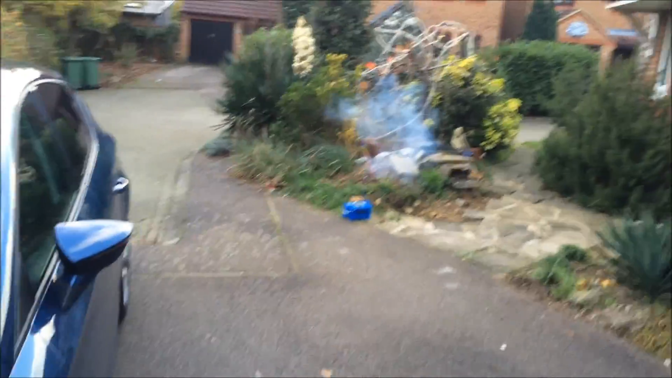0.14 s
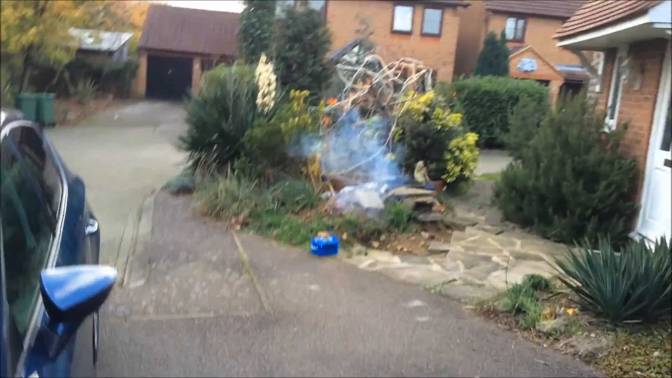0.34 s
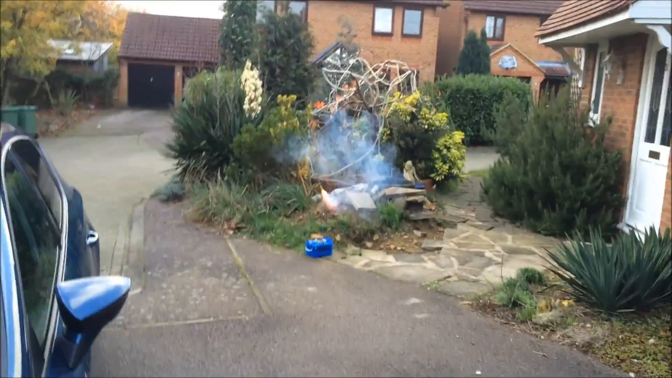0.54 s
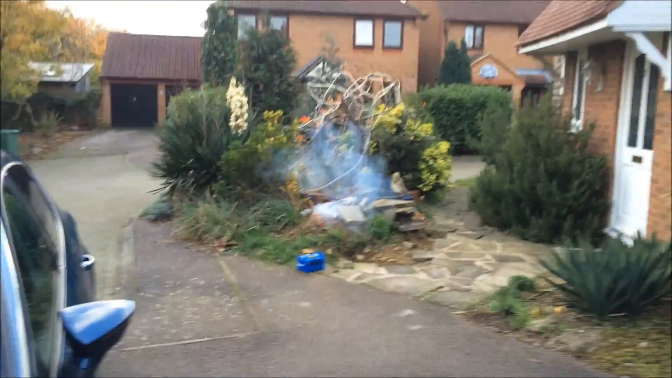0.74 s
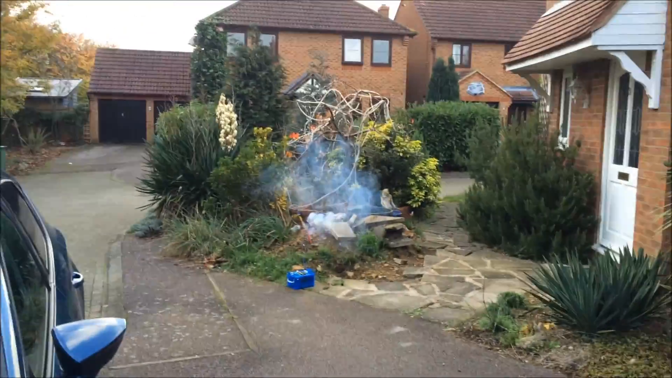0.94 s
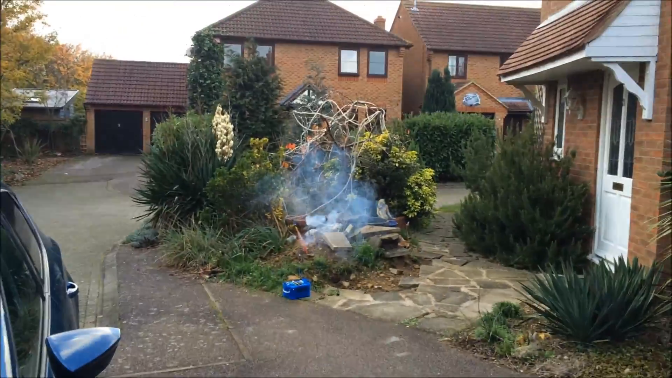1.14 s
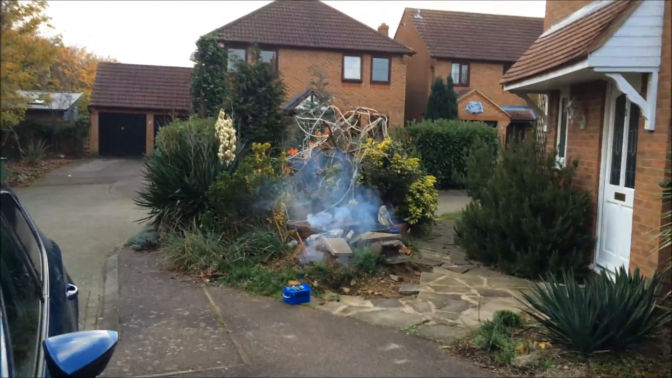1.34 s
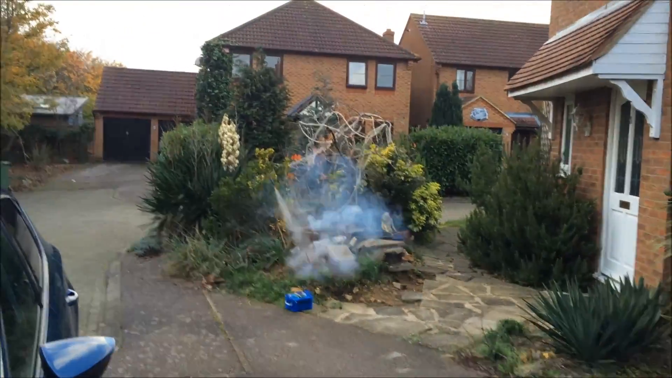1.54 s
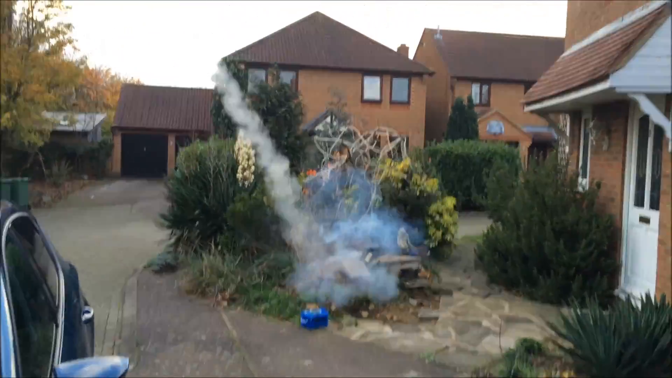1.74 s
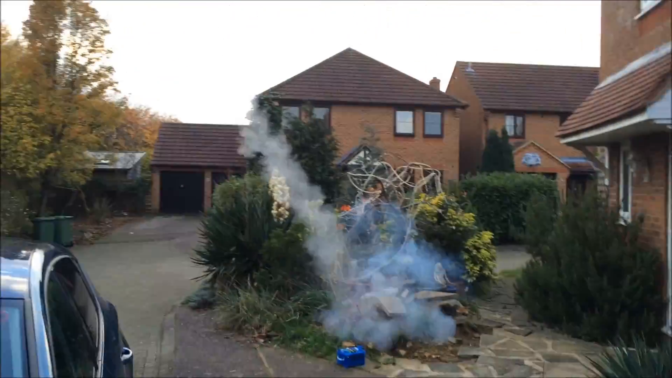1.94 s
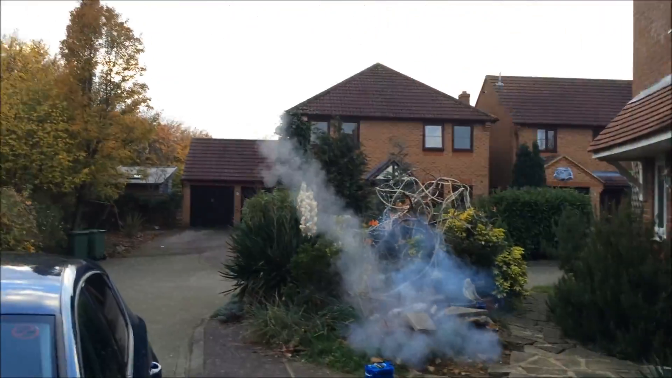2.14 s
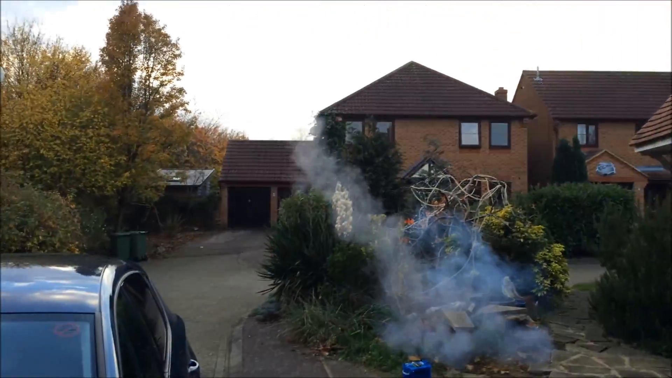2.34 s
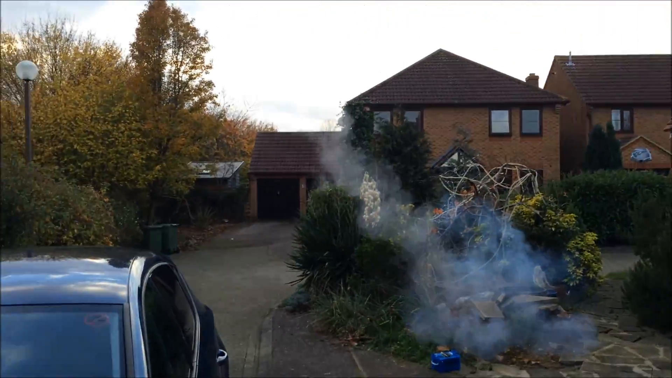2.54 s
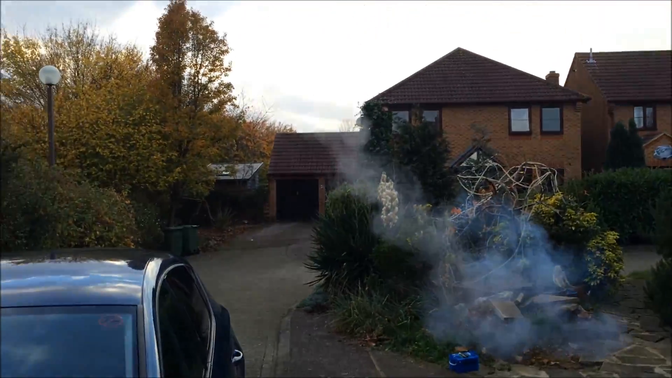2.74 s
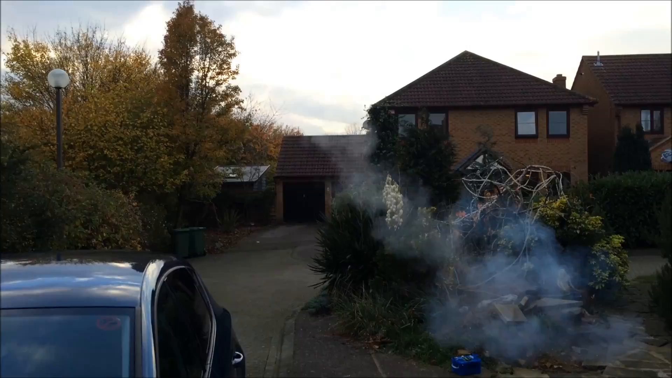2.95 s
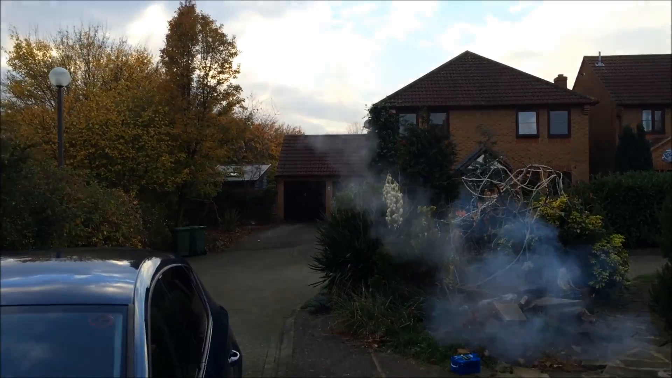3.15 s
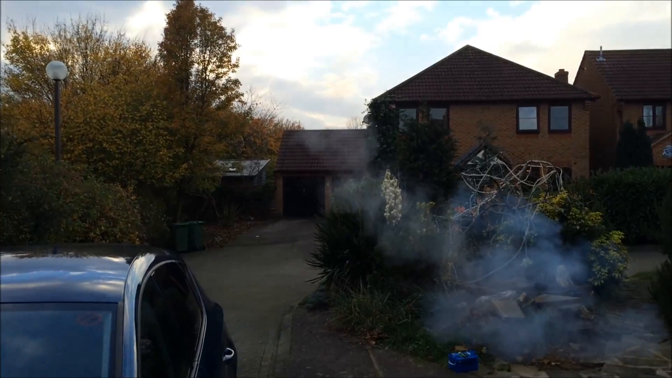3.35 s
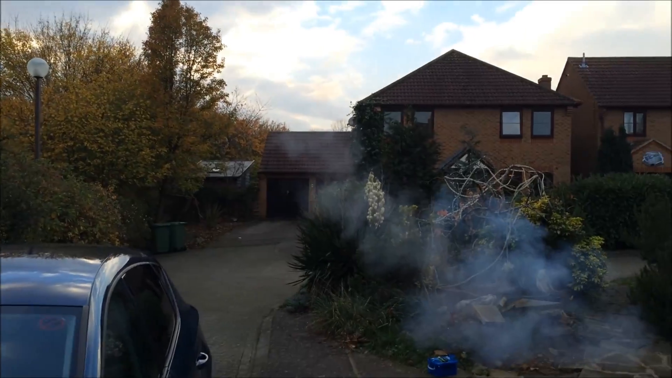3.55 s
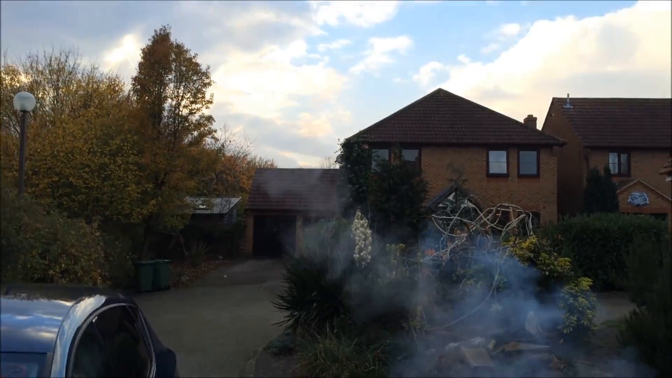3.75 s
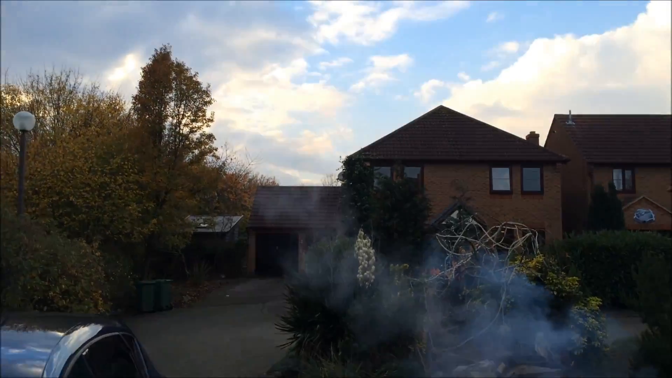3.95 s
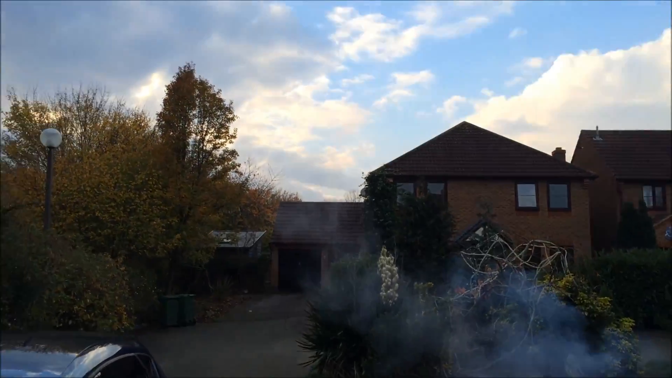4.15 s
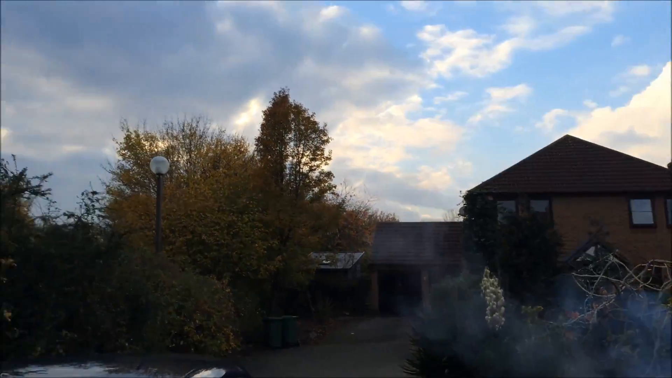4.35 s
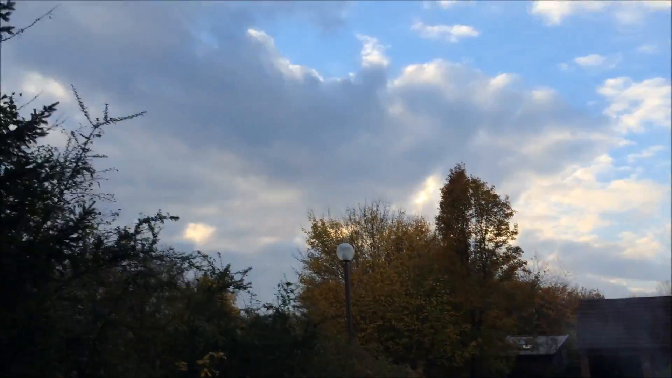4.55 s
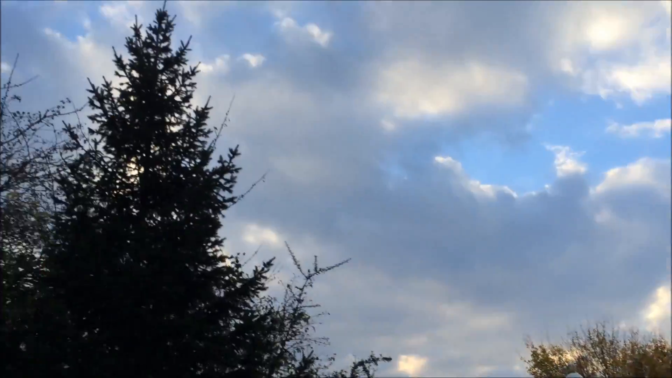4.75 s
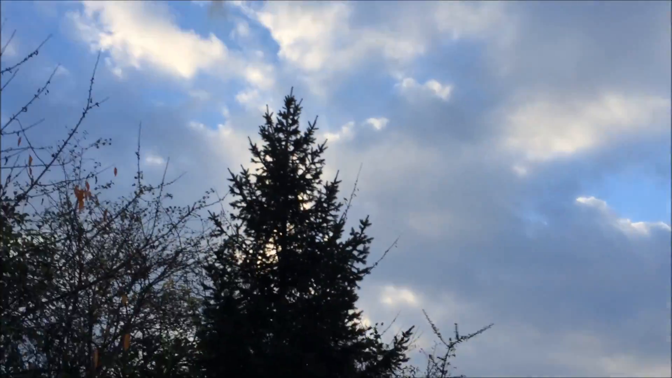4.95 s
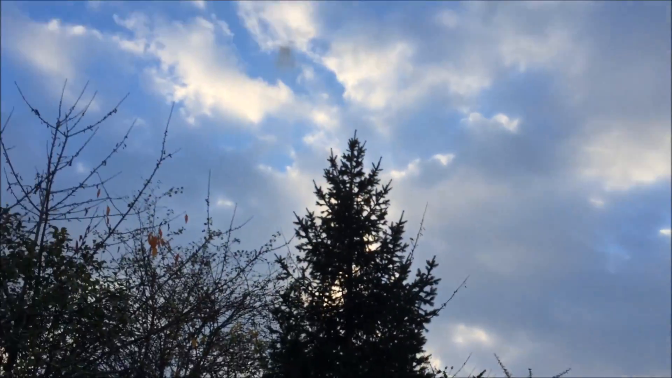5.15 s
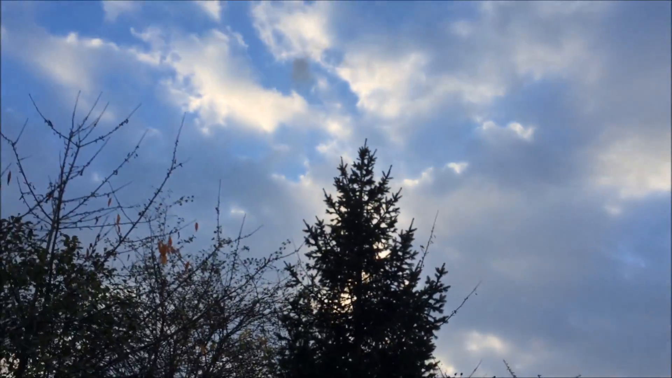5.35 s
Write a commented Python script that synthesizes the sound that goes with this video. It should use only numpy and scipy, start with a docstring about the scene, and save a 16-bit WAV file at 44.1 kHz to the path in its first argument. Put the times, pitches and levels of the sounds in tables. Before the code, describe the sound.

A firework fuse hisses faintly outdoors, swells into a loud roaring whoosh that fades upward, then bursts with a sharp bang and rolling echoes.

```python
"""Firework rocket from a front garden

Brick houses stand around one microphone near the pad; far traffic hums as two engine tones over rumbling noise.
Shoes scuff as bursts of gritty noise; the fuse hisses, the motor roars, and distance fades the noise of the jet.
The shell bursts as needles of pressure, and decaying noise makes the echoes that roll round the estate.
The recorder's limiter ducks under the launch and the bang, holds, then lets the surroundings swell back."""
import sys
import numpy as np
from scipy import signal
from scipy.fft import rfft, irfft, next_fast_len
from scipy.io import wavfile
from scipy.ndimage import uniform_filter1d, minimum_filter1d

SR = 44100
rng = np.random.default_rng(int(sys.argv[2]) if len(sys.argv) > 2 else 0)


def put_to_file(sound):
    """Save the sound as 16-bit audio at rate SR, in the file named by the first command-line argument."""
    columns = np.atleast_2d(sound).T  # one column per channel
    safe = np.clip(columns, -1, 1)
    whole_steps = np.round(safe * 32767)
    wavfile.write(sys.argv[1], SR, whole_steps.astype(np.int16))


N = 238263
T = np.arange(N) / SR   # seconds

# Colour of the open air and road rumble. Each row: frequency in Hz, density in dB per Hz.
AIR_COLOUR = [(20, -19.5), (45, -5.5), (80, 2), (130, -4), (210, -5.5), (330, -16.5), (600, -20),
              (950, -17), (2000, -20), (3200, -33.5), (7000, -39.5), (10000, -45.5), (16000, -44.5)]
# A distant engine holding its speed. Each row: time in s, firing rate in Hz, level in dB before the trim.
DRONE = [(0.04, 114.7, -42), (0.452, 116.8, -55), (0.552, 116.0, -43), (0.724, 117.8, -54),
         (1.254, 116.6, -50), (1.55, 112.3, -44)]
# A distant car picking up speed, then easing.
# Each row: time in s, firing rate in Hz, level in dB, second order in dB above it.
CAR = [(2.3, 79.5, -56, -11.5), (2.8, 80.8, -60.5, 6.5), (3.1, 81.7, -68, -10), (3.65, 84, -50, -20.5),
       (4.2, 90.76, -51, -1.5), (4.7, 98, -53.5, 0.5), (5.4, 92.8, -57, -5)]
DRONE_FADE_DB_PER_S, CAR_FADE_DB_PER_S = 22, 19.5   # after the drone's last row, before the car's first
DRONE_OVERTONE_DB = -56.5   # its 1.5th order, steady until the drone fades

# Shoes on the drive. Each row: start in s, scuff level in dB, scuff rise in s, scuff t60 in s, heel level in dB.
STEPS = [(.042, -46.5, 0.0072, .1, -39), (.306, -49, .006, 0.36, -40), (.6, -37, 0.091, .55, -58),
         (0.873, -36.5, .002, .25, -40), (0.917, -42.5, .005, 0.12, -50), (5.165, -51.5, .005, .15, -59)]
# Colour of a sole on gritty tarmac. Each row: frequency in Hz, density in dB per Hz.
SOLE_COLOUR = [(60, -1), (150, 9), (350, -7), (550, -7), (850, 3), (1250, -6), (1700, 7.5), (2250, -2.5),
               (3200, -8.5), (12000, -33)]

# First reflections off walls and paving round the garden. Each row: delay in ms, level in dB.
GARDEN_ECHOES = [(3.63, -15), (8.31, -16), (15.87, -15), (22.59, -14), (37.22, -15), (51.74, -16)]
# The burst and its echoes off the ground and near walls.
# Each row: time in s, strength in dB, share of the sharp shock from 0 to 1.
BANG = [(3.7951, 7, .8), (3.7988, 5.5, .65), (3.8031, -5, .05), (3.8108, 1, .1), (3.8177, 4, .9),
        (3.8192, -1, .4)]
BURST_S = BANG[0][0]
# Echoes off far houses. Each row: start in s, dull level in dB, bright level in dB, t60 in s.
FAR_ECHOES = [(3.894, -21.5, -37, 0.15), (3.962, -38.5, -22.5, 0.15), (3.995, -32.5, -20.5, 0.064),
              (4.112, -32, -25.5, 0.27), (4.21, -43, -34, 0.12), (4.282, -33, -32, 0.12),
              (4.439, -36, -49, 0.067), (4.9, -53, -64, 0.15)]
# Colour of scatter from near roofs and shrubs. Each row: frequency in Hz, density in dB per Hz.
SCATTER_COLOUR = [(40, -23), (130, 8), (300, -0.5), (520, 1), (800, 2.5), (1300, 1), (1800, -27),
                  (2300, -5), (3000, -12.5), (6500, -11.5), (10000, -23.5), (16000, -33)]
# Colour of the bang rolling round the estate. Each row: frequency in Hz, density in dB per Hz.
BANG_ROLL_COLOUR = [(60, -10), (180, -10), (380, -14.5), (700, -2.5), (1400, 1.5), (2000, -3), (3000, -9),
                    (6000, -10), (10000, -17), (16000, -28)]
# Colour of the launch coming back from the houses. Each row: frequency in Hz, density in dB per Hz.
LAUNCH_ROLL_COLOUR = [(60, -9), (380, -14.5), (700, -4), (1400, 0.5), (2000, -1.5), (3200, -15), (5200, 0),
                      (10000, -2.5), (16000, -11)]
# How long the roll lasts at each pitch. Each row: frequency in Hz, t60 in s.
ROLL_T60 = [(100, 2.4), (900, 1.97), (1800, 1.84), (3500, 1.28), (6500, 0.84), (13000, 0.58)]
HOUSE_ECHO_S = 0.28   # the far house fronts answer the launch this much later

# Colours of the jet's hiss, treble fizz and low roar. Each row: frequency in Hz, density in dB per Hz.
HISS_COLOUR = [(200, -24), (500, -8), (900, -4.5), (1600, -0.5), (2400, 0.5), (3500, -0.5), (5000, 1),
               (6500, 1), (8500, -4), (11000, -7), (16000, -17.5)]
FIZZ_COLOUR = [(5000, -23.5), (8000, -4), (10500, -5.5), (13500, -2.5), (16000, -5)]
ROAR_COLOUR = [(25, -20), (50, -8.5), (80, 2.5), (160, -1.5), (270, -12.5), (430, -2.5), (600, -5),
               (900, -10.5), (1500, -14), (3500, -27.5)]
# Level of the treble fizz. Each row: time in s, level in dB above the hiss.
FIZZ_LEVEL = [(0, -8), (1.33, -7.5), (1.63, 5.5), (1.9, -0.5), (2.02, -10), (3.78, -8.5)]
# The burning tube sings faintly. Each row: time in s, centre in Hz, level in dB above the hiss.
SINGING = [(.17, 4650, -4), (.42, 4770, -20), (.7, 6300, -2), (1.0, 6296, -11), (1.72, 6665, -7),
           (2.3, 5910, -15), (2.75, 5116, -7.5), (3.35, 6450, -3.5), (3.78, 7010, -5)]
# Sparks spitting from the rocket. Each row: start in s, level in dB.
SPITS = [(1.528, -18), (2.507, -39)]
# Gusts of exhaust striking the ground. Each row: time in s, level in dB, half length in s.
BLASTS = [(1.64, -13.5, 0.0043), (1.66, -25.5, 0.046), (1.772, -7, 0.019), (1.817, -7, 0.016),
          (1.847, -1.5, 0.022)]
# The propellant catches in sudden steps. Each row: time in s, gain in dB, half length in s.
FLARES = [(1.26, 8.6, .03), (1.584, 7, .012)]
FUSE_DB, FULL_THRUST_DB = -52.5, 7   # hiss heard from the pad
MOTOR_LIT_S, LIFT_OFF_S = 1.292, 1.9113
PAD_DISTANCE_M, LAUNCH_M_PER_S, DRAG_S = 3.75, 88.6, 0.92
FALL_DB_PER_DOUBLING, ROAR_KEEPS_DB_PER_DOUBLING = 13.2, 2.5   # the roar falls by the difference
ROAR_DB = -24.5   # at lift-off, relative to the hiss
REFLECTION_LAG_MS, REFLECTION_SHARE = .63, .3   # a near reflection combs the hiss
SINGING_CALM_WIDTH_HZ, SINGING_TURBULENT_WIDTH_HZ = 750, 2100
CALM_LOW_CUT_HZ = 950   # the calm jet has no body of hiss below this
CUTOFF_HZ = 15400   # top of the recorder's band


def from_db(db):
    """Decibels to an amplitude factor."""
    return 10 ** (np.asarray(db) / 20)


def rms_one(x):
    """Scale a signal to an rms of 1."""
    return x / np.sqrt(np.mean(x ** 2) + 1e-20)


def in_time(rows):
    """Each column of a curve, sample by sample."""
    times, *columns = np.transpose(rows)
    return [np.interp(T, times, column) for column in columns]


def at_hz(points, hz):
    """Read a table on a log-frequency axis."""
    table_hz, value = np.transpose(points)
    return np.interp(np.log(np.maximum(hz, 1)), np.log(table_hz), value)


def noise(colour):
    """Steady noise of a given colour, rms 1."""
    size = next_fast_len(N)
    gain = from_db(at_hz(colour, np.fft.rfftfreq(size, 1 / SR)))
    white = rng.standard_normal(size)
    return rms_one(irfft(rfft(white) * gain, size)[:N])


def butter(x, hz, kind, order=2):
    """Butterworth filter, kept below the top of the band."""
    sos = signal.butter(order, np.minimum(hz, SR / 2 - 100), kind, fs=SR, output="sos")
    return signal.sosfilt(sos, x + 1e-18)


def drift(rate_hz):
    """Random wander of rms 1, straight lines between `rate_hz` random points a second."""
    knots = rng.standard_normal(4096)
    return rms_one(np.interp(T * rate_hz, np.arange(len(knots)), knots))


def blow(start_s, rise_s, t60_s):
    """An envelope that swells quickly and dies away."""
    age = np.maximum(T - start_s, 0)
    return (1 - np.exp(-age / rise_s)) * from_db(-60 * age / t60_s)


def narrow_noise(hz, width_hz):
    """Noise in one resonance whose centre and width move."""
    knots = rng.standard_normal(N) + 1j * rng.standard_normal(N)
    wobble = np.interp(np.cumsum(width_hz) / SR, np.arange(N), knots)
    carrier = np.exp(2j * np.pi * np.cumsum(hz) / SR)
    return rms_one(np.real(wobble * carrier))


def garden(x):
    """Add the first reflections off paving and walls, then bring the sum to rms 1."""
    echoes = sum(from_db(db) * np.interp(T - ms / 1000, T, x, left=0) for ms, db in GARDEN_ECHOES)
    return rms_one(x + echoes)


def engine_phase(hz, waver):
    """The turning of an engine whose speed wavers a little."""
    return 2 * np.pi * np.cumsum(hz * (1 + waver * drift(18))) / SR


def traffic(air_db=-48.5, waver_db=2, drone_trim_db=-1.5):
    """Two wavering engine notes in a low rumble far off: one dies away as the other comes up."""
    hz, level_db = in_time(DRONE)
    phase = engine_phase(hz, waver=.014)
    gone_db = DRONE_FADE_DB_PER_S * np.maximum(T - DRONE[-1][0], 0)
    note = from_db(drone_trim_db + level_db) * np.sin(phase)
    overtone = from_db(DRONE_OVERTONE_DB) * np.sin(1.5 * phase)
    drone = from_db(-gone_db) * (note + overtone)

    hz, level_db, second_db = in_time(CAR)
    phase = engine_phase(hz, waver=.026)
    far_db = CAR_FADE_DB_PER_S * np.maximum(CAR[0][0] - T, 0)
    car = from_db(level_db - far_db) * (np.sin(phase) + from_db(second_db) * np.sin(2 * phase))

    hum = np.sqrt(2) * from_db(waver_db * drift(12)) * (drone + car)   # root 2: sine levels as rms
    return hum + from_db(air_db) * noise(AIR_COLOUR)


def shoes(grit_db=1.5, heel_low_hz=130, heel_high_hz=430, heel_t60_s=0.13):
    """A heel thuds softly and the sole grinds on gritty tarmac, its noise flickering in level."""
    scuff = sum(from_db(db) * blow(s, rise, t60) for s, db, rise, t60, _ in STEPS)
    thud = sum(from_db(db) * blow(s, 0.0059, heel_t60_s) for s, _, _, _, db in STEPS)
    sole = noise(SOLE_COLOUR) * from_db(grit_db * drift(270))
    heel = rms_one(butter(rng.standard_normal(N), [heel_low_hz, heel_high_hz], "band"))
    return scuff * sole + thud * heel


def far_rumble(level_db=-44, rise_s=0.42, t60_s=7.4, low_hz=170, high_hz=1100):
    """The last of the bang lingers, dull and even, from streets far away."""
    dull = rms_one(butter(noise(SCATTER_COLOUR), [low_hz, high_hz], "band"))
    return from_db(level_db) * blow(BURST_S, rise_s, t60_s) * dull


def roll(colour, start_s, rise_s, level_db):
    """Countless far echoes of a loud sound as decaying noise; the air takes the treble first."""
    spectrum = rfft(garden(noise(colour)))
    hz = np.fft.rfftfreq(N, 1 / SR)
    edges = 45 * 2 ** np.arange(0, 9, 1 / 3)   # third octaves, Hz
    out = np.zeros(N)
    for low, high in zip(edges, edges[1:]):
        band = irfft(spectrum * ((hz >= low) & (hz < high)), N)
        out += band * blow(start_s, rise_s, at_hz(ROLL_T60, np.sqrt(low * high)))
    return from_db(level_db) * out


def far_echoes(low_hz=110, high_hz=1000, bright_low_hz=1100, bright_high_hz=2100):
    """House fronts send the bang back as dull slaps, tiled roofs and trees as brighter smears."""
    dull = sum(from_db(db) * blow(s, 0.0012, t60) for s, db, _, t60 in FAR_ECHOES)
    bright = sum(from_db(db) * blow(s, 0.0033, t60) for s, _, db, t60 in FAR_ECHOES)
    slap = rms_one(butter(noise(SCATTER_COLOUR), [low_hz, high_hz], "band"))
    smear = rms_one(butter(noise(BANG_ROLL_COLOUR), [bright_low_hz, bright_high_hz], "band"))
    return dull * slap + bright * smear


def near_scatter(thud_db=-10, thud_t60_s=0.21, thud_hz=1300,
                 boom_db=-20, boom_t60_s=0.19, boom_low_hz=100, boom_high_hz=250,
                 spray_db=-5, spray_start_s=3.812, spray_t60_s=0.13, spray_low_hz=130):
    """A dull thud and a low boom follow the burst, then a dense spray of echoes from roofs and shrubs."""
    dull = butter(noise(SCATTER_COLOUR), thud_hz, "low")
    thud = from_db(thud_db) * blow(BURST_S, 0.0041, thud_t60_s) * dull
    deep = rms_one(butter(rng.standard_normal(N), [boom_low_hz, boom_high_hz], "band"))
    boom = from_db(boom_db) * blow(BURST_S, 0.007, boom_t60_s) * deep
    scattered = butter(noise(SCATTER_COLOUR), spray_low_hz, "high")
    spray = from_db(spray_db) * blow(spray_start_s, 0.0038, spray_t60_s) * scattered
    return thud + boom + spray


def burst(shock_s=.00005, suction_lag_s=0.0005, suction_s=0.00021, low_cut_hz=90):
    """A needle of pressure with a rounded suction behind it, repeated by each near surface."""
    out = np.zeros(N)
    for s, strength_db, sharp in BANG:
        age = T - round(s * SR) / SR   # the needle's tip falls on a sample
        shock = np.exp(-np.abs(age) / shock_s)
        suction = np.exp(-((age - suction_lag_s) / suction_s) ** 2)
        out += from_db(strength_db) * (sharp * shock - suction)
    return butter(out, low_cut_hz, "high", order=1)


def flight():
    """Thrust (0-1) and doublings of distance for a rocket launched fast and braked by drag."""
    thrust = np.clip((T - MOTOR_LIT_S) / (LIFT_OFF_S - MOTOR_LIT_S), 0, 1)
    airborne_s = np.maximum(T - LIFT_OFF_S, 0)
    flown_m = LAUNCH_M_PER_S * DRAG_S * (1 - np.exp(-airborne_s / DRAG_S))
    return thrust, np.log2(1 + flown_m / PAD_DISTANCE_M)


def motor_level(thrust):
    """The hiss on the pad in dB: a steady climb with sudden flares on the way."""
    flares_db = sum(db * .5 * (1 + np.tanh((T - s) / half)) for s, db, half in FLARES)
    climb_db = FULL_THRUST_DB - FUSE_DB - flares_db[-1]
    return FUSE_DB + climb_db * thrust + flares_db


def jet_hiss(turbulence):
    """Hiss and fizz from the nozzle; turbulence adds body and blurs away a comb-like reflection."""
    fizz_db, = in_time(FIZZ_LEVEL)
    body = turbulence * butter(garden(noise(HISS_COLOUR)), CALM_LOW_CUT_HZ, "low")
    upper = butter(garden(noise(HISS_COLOUR)), CALM_LOW_CUT_HZ, "high")
    direct = body + upper + from_db(fizz_db) * garden(noise(FIZZ_COLOUR))
    mirrored = np.interp(T - REFLECTION_LAG_MS / 1000, T, direct)
    share = REFLECTION_SHARE * (1 - turbulence)
    return (direct + share * mirrored) / np.sqrt(1 + share ** 2)


def tube_singing(turbulence, low_cut_hz=3000):
    """The burning tube resonates as narrow noise that widens with turbulence."""
    hz, level_db = in_time(SINGING)
    width_hz = SINGING_CALM_WIDTH_HZ + (SINGING_TURBULENT_WIDTH_HZ - SINGING_CALM_WIDTH_HZ) * turbulence
    return from_db(level_db) * garden(butter(narrow_noise(hz, width_hz), low_cut_hz, "high"))


def rocket(flutter_db=.9, flutter_rate_hz=120, spit_t60_s=0.024, turbulence_power=3.2, burn_out_t60_s=0.52):
    """Turbulent gas hisses and sings, and a low roar surges when the exhaust beats on the ground."""
    thrust, doublings = flight()
    turbulence = thrust ** turbulence_power
    level_db = motor_level(thrust) - FALL_DB_PER_DOUBLING * doublings
    flutter = flutter_db * drift(flutter_rate_hz)
    jet = from_db(level_db + flutter) * (jet_hiss(turbulence) + tube_singing(turbulence))

    blasts = sum(from_db(db) * np.exp(-((T - s) / half) ** 2) for s, db, half in BLASTS)
    roar_db = level_db + ROAR_DB + ROAR_KEEPS_DB_PER_DOUBLING * doublings
    roar = (turbulence * from_db(roar_db) + blasts) * garden(noise(ROAR_COLOUR))

    spits = sum(from_db(db) * blow(s, 0.00049, spit_t60_s) for s, db in SPITS) * noise(HISS_COLOUR)
    burning = from_db(-60 * np.maximum(T - BURST_S, 0) / burn_out_t60_s)   # dies away after the burst
    return burning * (jet + roar) + spits


def scene():
    """One microphone hears it all, the same in both channels."""
    surroundings = traffic() + shoes()
    bang_tail = far_rumble() + roll(BANG_ROLL_COLOUR, start_s=BURST_S, rise_s=0.0099, level_db=-22)
    bang = bang_tail + far_echoes() + near_scatter() + burst()
    launch_roll = roll(LAUNCH_ROLL_COLOUR, start_s=LIFT_OFF_S + HOUSE_ECHO_S, rise_s=0.038, level_db=-26.5)
    mono = surroundings + bang + launch_roll + rocket()
    return np.array([mono, mono])


def limiter(x, ceiling_db=-8.5, hold_s=0.22, release_s=0.4):
    """The gain drops at once under a loud sound, is held, then creeps back."""
    power = uniform_filter1d(np.mean(x ** 2, axis=0), size=96)
    level = np.sqrt(np.maximum(power, 1e-12))
    wanted = np.minimum(1, from_db(ceiling_db) / level)
    half = int(hold_s * SR / 2)
    held = minimum_filter1d(wanted, 2 * half + 1, origin=half)   # lowest gain of the last hold_s
    fade = np.exp(-T / release_s)
    reduction = np.maximum.accumulate((1 - held) / fade) * fade   # recovers exponentially
    return x * (1 - reduction)


def record(dry):
    """Limiter, clipping just under full scale and a steep cut of the top before and after."""
    top_cut = signal.ellip(10, .05, 50, CUTOFF_HZ, fs=SR, output="sos")
    limited = limiter(signal.sosfiltfilt(top_cut, dry))
    return signal.sosfiltfilt(top_cut, np.clip(limited, -.92, .92))


dry = scene()
out = record(dry)
put_to_file(out)
```